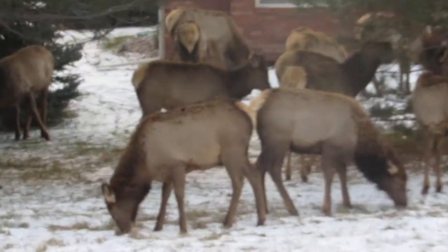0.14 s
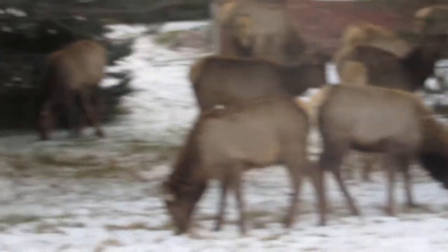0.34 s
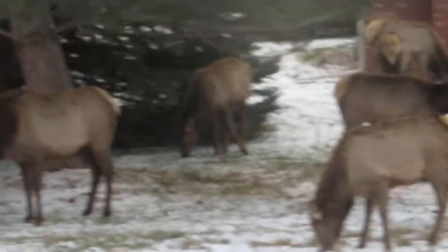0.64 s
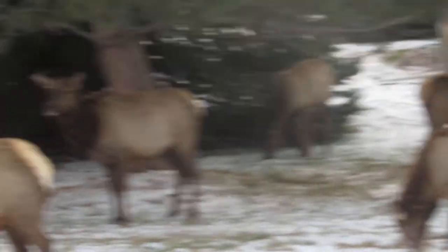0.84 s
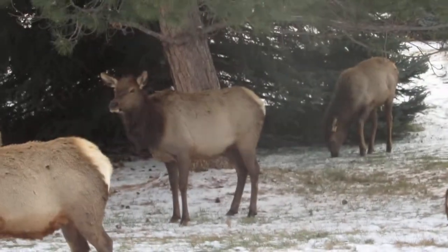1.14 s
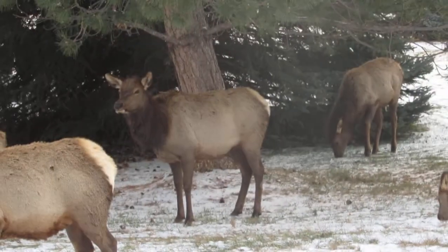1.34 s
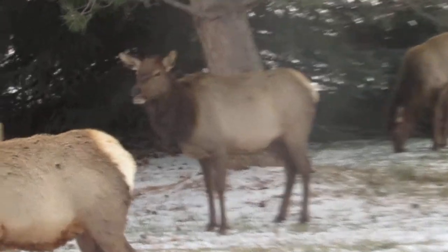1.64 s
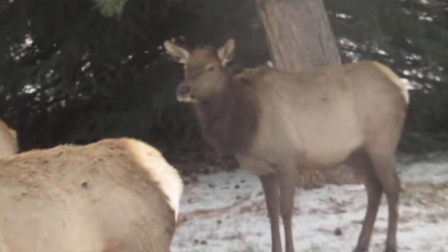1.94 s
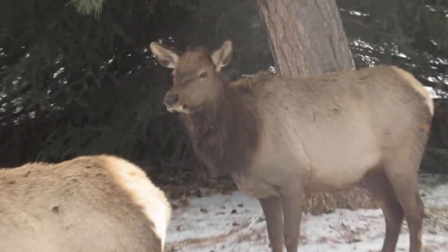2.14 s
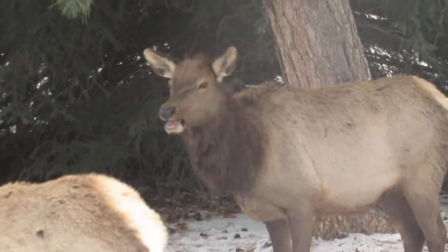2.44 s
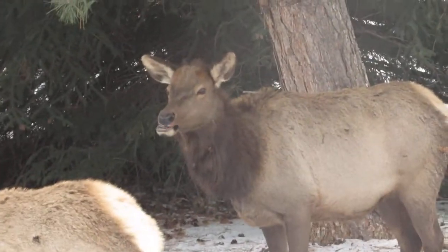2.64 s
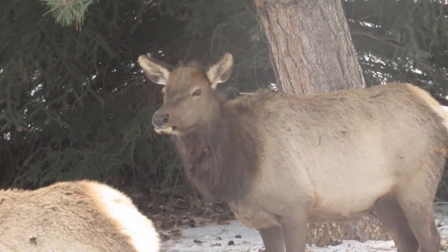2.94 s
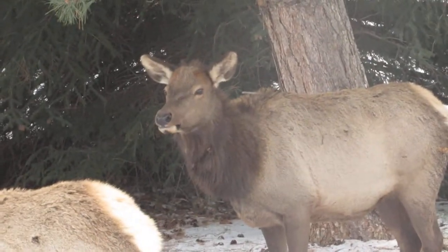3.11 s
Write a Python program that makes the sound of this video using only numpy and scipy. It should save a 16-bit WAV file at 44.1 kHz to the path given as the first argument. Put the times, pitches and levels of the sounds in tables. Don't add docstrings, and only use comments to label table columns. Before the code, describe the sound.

Mewing elk call at the start, in the middle and later, over low engine rumble and faint hiss. Close camera noises intrude: rapid lens ticking, a brief dip in sound, then zoom whirr.

```python
import sys
import numpy as np
from scipy import signal
from scipy.fft import rfft, irfft, next_fast_len
from scipy.io import wavfile
from scipy.ndimage import uniform_filter1d

SR = 44100
rng = np.random.default_rng(int(sys.argv[2]) if len(sys.argv) > 2 else 0)


def undo_db(level):
    steps = np.asarray(level, float) / 20
    return 10 ** steps


def to_wav(s):
    ch = np.atleast_2d(s).T
    pcm = np.round(np.clip(ch, -1, 1) * 32767)
    wavfile.write(sys.argv[1], SR, pcm.astype(np.int16))


N = 144207
T = np.arange(N) / SR
HZ = np.maximum(np.fft.rfftfreq(next_fast_len(N), 1 / SR), 1)
MUTE_S, UNMUTE_S = 1.437, 1.505


def read(table, hz, **ends):
    rows = np.array(table, float)
    return np.interp(np.log(hz), np.log(rows[:, 0]), rows[:, 1], **ends)


def level(x, db):
    return x * undo_db(db) / np.sqrt(np.mean(x ** 2))


def shape(x, gain):
    size = next_fast_len(N)
    return irfft(rfft(x, size) * gain, size)[..., :N]


def bell(hz, width_hz):
    return np.exp(-.5 * ((HZ - hz) / (width_hz / 2)) ** 2)


def walk(rate_hz):
    hold = int(SR / rate_hz)
    levels = np.repeat(rng.standard_normal(N // hold + 1), hold)
    smooth = uniform_filter1d(uniform_filter1d(levels, hold), hold)[:N]
    return smooth / smooth.std()


def mew(call, throat):
    rows = np.array(call, float)
    hz, effort_db, mouth_db = (np.interp(T, rows[:, 0], rows[:, k]) for k in range(1, 4))
    hz = hz * (1 + .003 * walk(60))
    begun = rows[0, 0] < .01
    edge_s = .01
    gate = np.clip(np.minimum(T - rows[0, 0] + begun, rows[-1, 0] - T) / edge_s, 0, 1)
    phase = 2 * np.pi * np.cumsum(hz) / SR
    voice = 0
    for k in range(1, 7):
        flutter_db = 1.8 * walk(49.37)
        upper_db = -9 * max(k - 4, 0)
        partial_db = read(throat, k * hz) + flutter_db + (k - 1) * mouth_db + upper_db
        voice = voice + undo_db(partial_db) * np.sin(k * phase)
    return np.sqrt(2) * voice * gate * undo_db(effort_db)


def herd():
    # (time [s], pitch [Hz], effort [dB], mouth opening [dB per partial])
    calls = [
        [(0, 1135, -57, 0), (.044, 1038, -57, 0), (.068, 985, -58, -3), (.114, 929, -61, -1),
         (.14, 865, -70, 1), (.2, 820, -76, 0)],
        [(1.15, 1250, -56, -9), (1.185, 1225, -50, -9), (1.218, 1140, -52, -8), (1.228, 1098, -57, 0),
         (1.344, 1008, -57, 0), (1.394, 908, -55, -2), (1.44, 800, -55, -2.5)],
        [(2.2, 1395, -66, 0), (2.212, 1448, -62, 0), (2.25, 1492, -62, 0), (2.3, 1447, -62, 0),
         (2.318, 1257, -62, -3), (2.335, 1200, -60, -3)],
        [(2.33, 1550, -76, 3), (2.348, 1530, -70, 2), (2.354, 1600, -62, -5), (2.405, 1270, -61, -6),
         (2.43, 1210, -58, -6), (2.44, 1200, -72, -6)],
    ]
    # (frequency [Hz], gain [dB])
    throats = [
        [(1150, 16), (2100, -7), (2750, 3), (3000, -13), (3350, -2), (3750, -18), (4200, 2), (5000, -6)],
        [(1750, -11), (2100, 3), (2330, -3), (2620, 11), (2950, -3), (3300, -1), (3800, -13), (4250, -3)],
        [(1300, 0), (1490, 8), (2450, 2), (2700, -4), (2950, 0), (3800, -14), (4400, -3), (5500, -25)],
        [(1300, -5), (2450, 1), (2800, -1), (3100, 2), (3800, -14), (4500, 1), (5500, -25)],
    ]
    return sum(mew(call, throat) for call, throat in zip(calls, throats))


def lens_motor():
    # (first step [s], end [s], level [dB])
    runs = [
        (.0273, 0.244, -58),
        (1.534, 2.27, -54.5),
        (2.293, 2.42, -57.5),
    ]
    step_s = [.00835, .005005, .0085]
    step_db = [0.1, 1.5, 0.1, -9, -9, -6]
    # (centre [Hz], width [Hz], level [dB])
    gears = [(2530, 350, -66.5), (12600, 2900, -71), (8800, 3500, -68.5)]
    barrel_hz, width_hz, ring_s = 12300, 1500, .0008
    tone_share = .6

    hits = np.zeros(N)
    for (start, end, db), gap in zip(runs, step_s):
        at = np.arange(start, end, gap)
        scatter_db = 1.5 * rng.standard_normal(len(at))
        hits[(at * SR).astype(int)] += undo_db(db + np.resize(step_db, len(at)) + scatter_db)
    bump = np.exp(-.5 * (2 * np.pi * HZ * ring_s) ** 2)
    knock = shape(hits, bump) * ring_s * SR * np.sqrt(2 * np.pi)

    rattle = level(shape(rng.standard_normal((2, N)), bell(barrel_hz, width_hz)), 0)
    port_phase = np.array([[0], [1.7]])
    tone = np.sin(2 * np.pi * barrel_hz * T + 3 * walk(400) + port_phase)
    barrel = np.sqrt(1 - tone_share) * rattle + np.sqrt(2 * tone_share) * tone

    whine = sum(level(shape(rng.standard_normal(N), bell(hz, w)), db) for hz, w, db in gears)
    running = (T > runs[1][0]) * np.clip((runs[2][1] - T) / 0.081, 0, 1)
    return knock * barrel + whine * running


def camera_body():
    # (time [s], level [dB], centre [Hz], width [Hz], length [s])
    clicks = [
        (.218, -54, 8000, 12000, .003),
        (1.38, -60, 6000, 3000, .004),
        (3.051, -65, 11000, 6000, .003),
    ]
    ticks = 0
    for at, db, hz, width_hz, length_s in clicks:
        burst = level(shape(rng.standard_normal(N), bell(hz, width_hz)), db)
        ticks = ticks + burst * np.exp(-.5 * ((T - at) / length_s) ** 2)
    squeak_s, squeak_hz, squeak_db, squeak_length_s = 2.58, 2300, -53, .005
    squeak = undo_db(squeak_db) * np.sqrt(2) * np.sin(2 * np.pi * squeak_hz * T)
    return ticks + squeak * np.exp(-.5 * ((T - squeak_s) / squeak_length_s) ** 2)


def zoom_whirr():
    # (frequency [Hz], level [dB per Hz])
    colour = [(600, -22), (1550, -4), (2050, -13), (2450, 4), (2800, -14), (4500, -18), (7000, -24),
              (14000, -36)]
    whirr = level(shape(rng.standard_normal(N), undo_db(read(colour, HZ, left=-60))), -48.5)
    since = T - UNMUTE_S
    hold_s, fade_s = .04, .025
    return whirr * (since > -.07) * np.exp(-np.maximum(since - hold_s, 0) / fade_s)


def engine_tones(phase):
    # (multiple, level [dB], wander [dB])
    orders = [(1, -61, 3), (2, -45, 1), (3, -47, 2), (4, -51, 4), (5, -48, 4), (6, -45, 4)]
    tones = 0
    for k, db, wander_db in orders:
        strength = undo_db(db + 0.23 + wander_db * walk(5.47))
        tones = tones + np.sqrt(2) * strength * np.sin(k * phase + rng.uniform(0, 2 * np.pi))
    return tones


def noise(table, db, flicker_db, throb_db=0):
    # (frequency [Hz], width [Hz], lift [dB])
    panels = [(1053, 88, 7.5), (1232, 62, 7), (1620, 20, 3.5), (2417, 80, 6.5), (3920, 250, 3.5),
              (4450, 47, 6), (5850, 340, 4)]
    lift_db = sum(lift * bell(hz, width_hz) for hz, width_hz, lift in panels)
    gain = undo_db(read(table, HZ, left=-90, right=-88) + lift_db)
    position = 2 * np.log2(HZ / 30)
    first = int(2 * np.log2(table[0][0] / 30))
    last = int(2 * np.log2(table[-1][0] / 30))
    out = 0
    for k in range(first, last + 2):
        share = np.sqrt(np.clip(1 - abs(position - k), 0, 1))
        band = shape(rng.standard_normal((2, N)), gain * share)
        out = out + band * undo_db(flicker_db * walk(9.28) + throb_db)
    return level(out, db)


def engine_and_air():
    # (time [s], frequency [Hz])
    idle = [(0.0, 23.1), (0.55, 22.3), (1.36, 22.4), (1.44, 23.1), (3.27, 23.0)]
    # (time [s], level [dB])
    breeze = [(0, 3.5), (.4, 0.5), (1.0, 2.1), (1.4, 5), (1.6, 1.8), (2.3, 1.5), (2.55, 0.4), (3.27, 3)]
    # (frequency [Hz], level [dB per Hz])
    boom = [(30, -40), (60, -18.5), (100, -9.5), (138, -2.5), (200, -12), (320, -17.5), (540, -24.5),
            (690, -36)]
    # (frequency [Hz], level [dB per Hz])
    clatter = [(600, -63), (690, -19), (810, 1), (1060, -2.5), (1500, -4.5), (1900, -14.5), (2420, -20),
               (3300, -27.5)]
    # (frequency [Hz], level [dB per Hz])
    hiss = [(1760, -31), (3000, -9), (4370, -3), (5160, -7.5), (6620, -4), (12800, -8), (13900, -15),
            (14900, 2)]
    speed = np.interp(T, *np.array(idle).T) * (1 + 0.0046 * walk(5.76))
    phase = 2 * np.pi * np.cumsum(speed) / SR
    swell_db = np.interp(T, *np.array(breeze).T)
    throb_db = 0.5 * np.sin(2 * phase) + 0.58 * swell_db
    bed = noise(boom, -33.5, 1.0) + noise(clatter, -45, 0.89, throb_db) + noise(hiss, -59, 0.2, swell_db)
    return bed + np.array([engine_tones(phase), 0 * T])


def ports(common, different):
    # (frequency [Hz], left over right [dB])
    balance = [(60, 5.5), (110, 5.5), (200, 5.5), (370, 3.5), (690, 0.6), (1260, -2.5), (2320, -1.5),
               (4270, 0.8), (7850, 0.8), (14400, 0.4)]
    # (frequency [Hz], left ahead of right [radians])
    lead = [(40, .8), (300, .6), (1030, -1.1), (1460, -.3), (4050, 0.01), (5600, -.4), (9000, -1.6),
            (14000, -3.2)]
    # (frequency [Hz], likeness [0-1])
    alike = [(60, .99), (250, .9), (600, .86), (1200, .84), (2000, .9), (3500, .92), (4600, .5),
             (8000, .35)]
    likeness = np.clip(read(alike, HZ), 0, 1)
    tilt = undo_db(read(balance, HZ) / 2) * np.exp(.5j * read(lead, HZ))
    middle = shape(common, np.sqrt((1 + likeness) / 2))
    side = shape(different, np.sqrt((1 - likeness) / 2))
    return np.array([shape(middle + side, tilt), shape(middle - side, 1 / tilt)])


def scene():
    camera = lens_motor() + camera_body() + zoom_whirr()
    return herd() + camera + ports(*engine_and_air())


def roll_off(x):
    return signal.sosfilt(signal.butter(12, 15040, fs=SR, output="sos"), x)


def record(dry):
    edge_s, mute_db = .002, -16
    duck = np.clip(np.minimum(T - MUTE_S, UNMUTE_S - T) / edge_s + .5, 0, 1)
    return roll_off(dry * undo_db(mute_db * duck))


dry = scene()
out = record(dry)
to_wav(out)
```